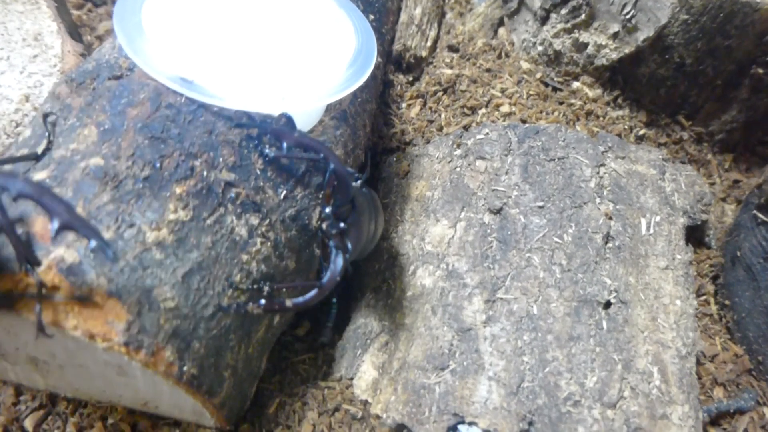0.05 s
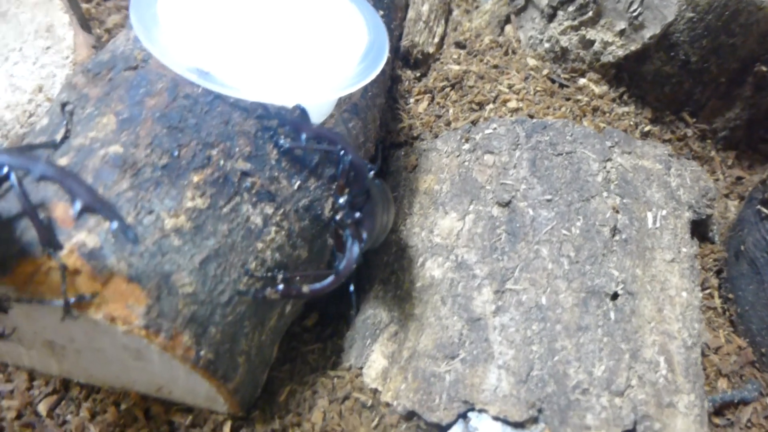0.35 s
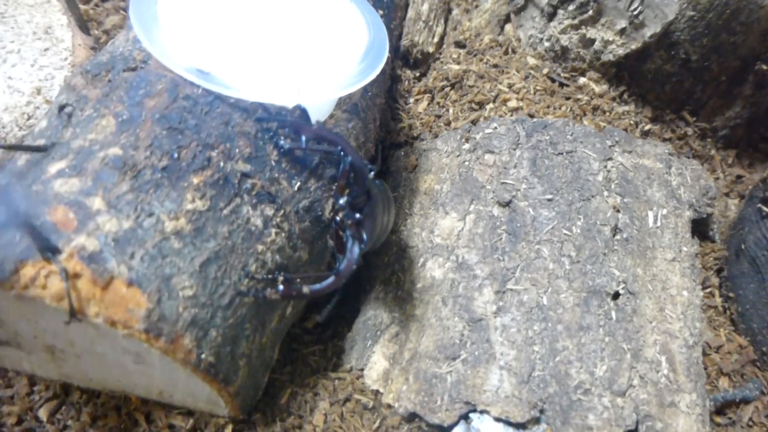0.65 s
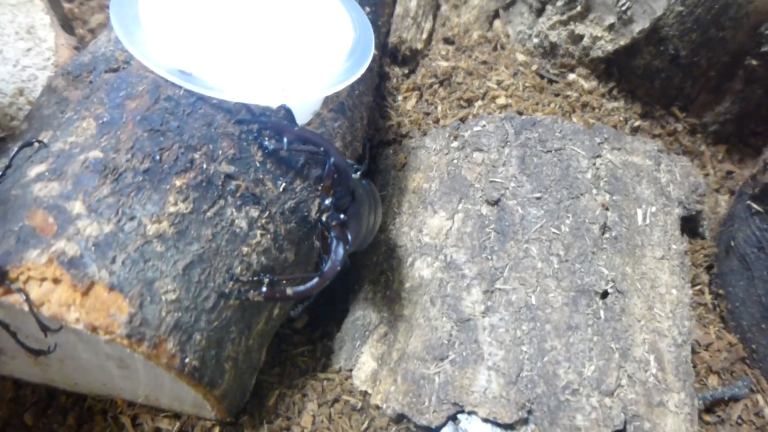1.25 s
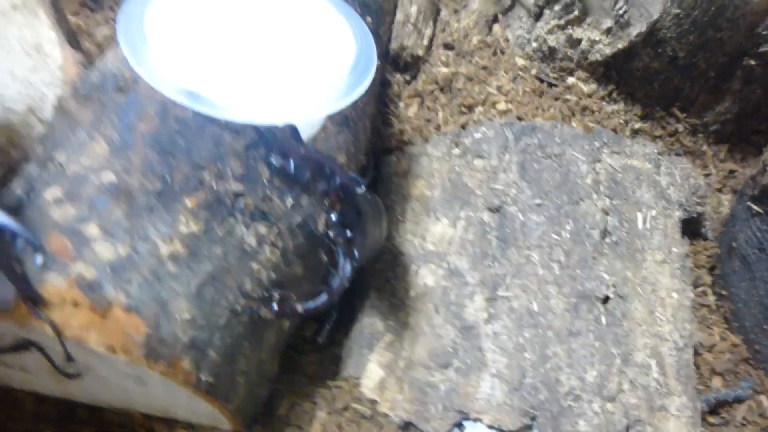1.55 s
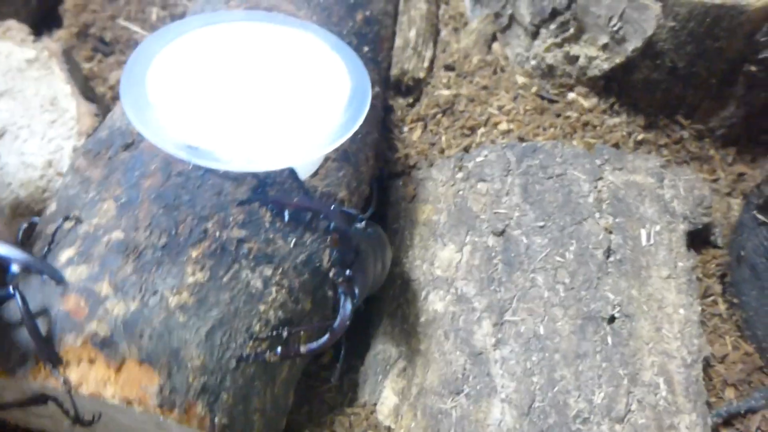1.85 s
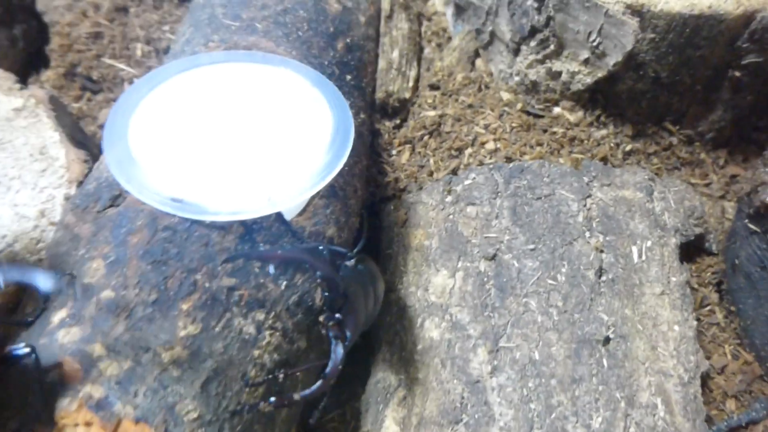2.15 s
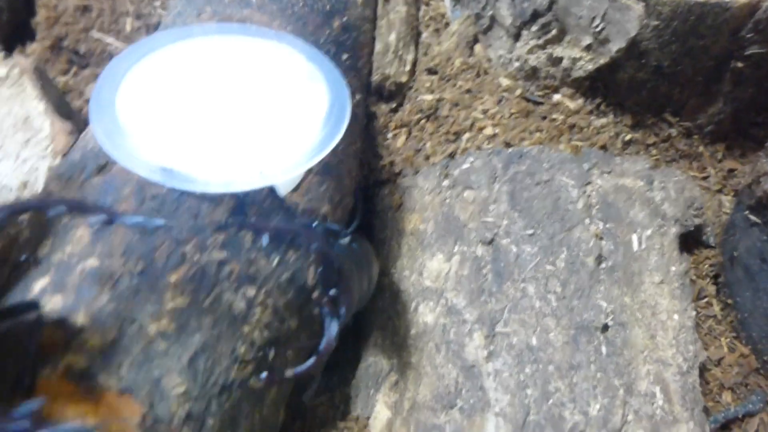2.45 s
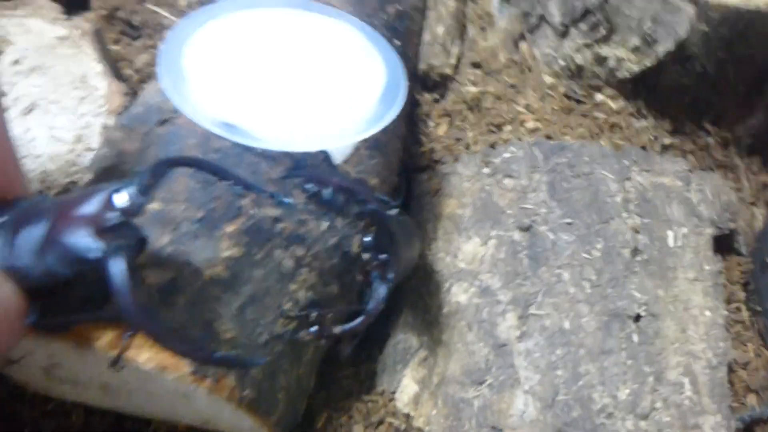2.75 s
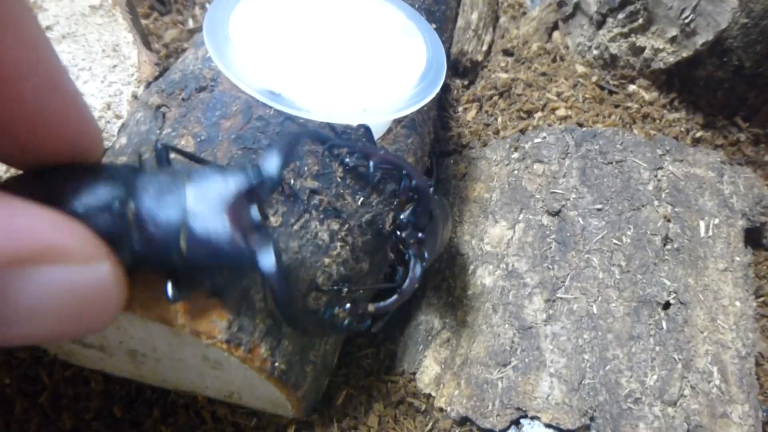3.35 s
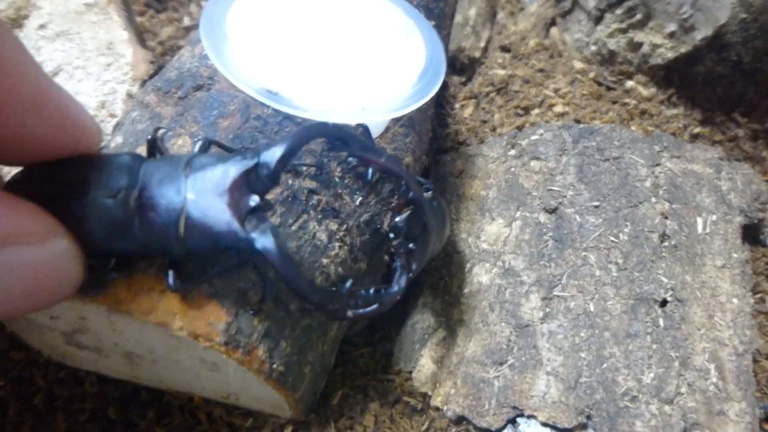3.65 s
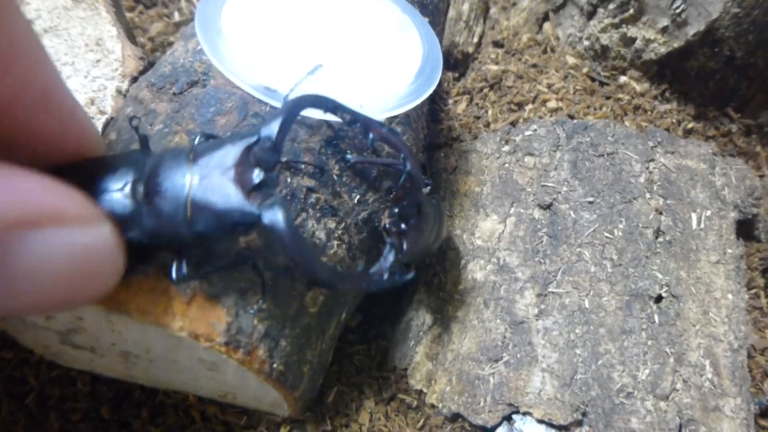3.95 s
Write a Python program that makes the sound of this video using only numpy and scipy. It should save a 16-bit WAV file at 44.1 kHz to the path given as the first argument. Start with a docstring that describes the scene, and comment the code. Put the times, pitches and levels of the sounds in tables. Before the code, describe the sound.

Beetle claws tick and scrape lightly on a log, growing busier with a few faint wooden knocks, until three sharp jaw clicks stand out. A low rumble and thin hiss continue underneath in a small, slightly echoing room.

```python
"""On a log in a small room, two stag beetles meet, a little to the left. Their claws tick as they
catch on the bark and scrape as they drag over it in many tiny slips. The wood knocks dully when
a body bumps it. Near the end their hard jaws click together three times, shell on shell.
The room echoes faintly, over a steady rumble and a thin hiss."""
import sys
import numpy as np
from scipy import signal
from scipy.fft import rfft, irfft, next_fast_len
from scipy.io import wavfile
from scipy.ndimage import uniform_filter1d

SR = 44100
rng = np.random.default_rng(int(sys.argv[2]) if len(sys.argv) > 2 else 0)


def transcribe(signal):
    """Save signal, clipped to [-1, 1], as a 16-bit WAV file at the path in sys.argv[1]."""
    frames = np.atleast_2d(signal).T
    limited = np.clip(frames, -1, 1)
    pcm = np.round(limited * 32767).astype(np.int16)
    wavfile.write(sys.argv[1], SR, pcm)


N = 176400

# How much of a click's treble boost each pitch gets: (frequency [Hz], share [0-1])
TREBLE_SHARE = [(8500, 0.12), (11000, 0.88)]
# The same for its glint, the glassy very top: (frequency [Hz], share [0-1])
GLINT_SHARE = [(12500, 0), (14500, 1)]
SLIP_S = 0.0032  # the slip before a click swells by 60 dB in this time


def amp(db):
    """Turn decibels into a gain."""
    return 10 ** (np.asarray(db) / 20)


def unit(x):
    """Scale to an average (rms) level of 1."""
    return x / np.sqrt(np.mean(x ** 2) + 1e-20)


def burst(x):
    """Scale to the energy of one millisecond at level 1."""
    return unit(x) * np.sqrt(SR / 1000 / x.shape[-1])


def along(points, hz):
    """Read a curve of (frequency, value) points on a log frequency axis."""
    freqs, values = np.transpose(points)
    return np.interp(np.log(hz + 1), np.log(freqs + 1), values)


def filtered(x, response):
    """Give each frequency in x the gain response(hz)."""
    size = next_fast_len(N + SR // 2)
    return irfft(rfft(x, size) * response(np.fft.rfftfreq(size, 1 / SR)), size)[..., :N]


def shape_tone(x, gain_db):
    """Filter a short sound so that no ringing comes ahead of it (minimum phase)."""
    cepstrum = irfft(np.log(amp(gain_db)))
    half = len(cepstrum) // 2
    one_sided = np.r_[cepstrum[0], 2 * cepstrum[1:half], np.zeros(half)]
    return irfft(rfft(x) * np.exp(rfft(one_sided)))


def add(track, start, x):
    """Mix x into the track, start seconds in."""
    part = track[:, round(start * SR):][:, :x.shape[-1]]
    part += x[..., :part.shape[1]]


def stereo_noise(size, apart_radians=0.33):
    """Noise that is mostly alike on the left and right."""
    common, side = rng.standard_normal((2, size))
    return np.cos(apart_radians) * common + np.sin(apart_radians) * np.array([side, -side])


def hump(hz, ring_hz, width_hz=720):
    """A broad peak of height 1 around the pitch where something rings."""
    return 1 / (1 + ((hz - ring_hz) / width_hz) ** 2)


def ring(hz, t60, attack_s=0.000081):
    """One ringing tone; t60 is the seconds it takes to fade by 60 dB."""
    t = np.arange(SR // 8) / SR
    return amp(-60 * t / t60) * (1 - np.exp(-t / attack_s)) * np.sin(2 * np.pi * hz * t)


def room_air(level_db=-48, flicker_db=1.03):
    """Steady rumble and hiss: the bass sits right; in the middle pitches the sides move oppositely."""
    # Tone of the air on the right: (frequency [Hz], relative level [dB])
    tone = [(20, -23), (65, -25), (100, -13), (160, -3), (220, 0.5), (320, -0.47), (450, -3), (700, -5),
            (1150, -6), (1600, -13.5), (2000, -17), (2500, -22), (3600, -26), (4100, -22.5), (4500, -24.5),
            (5200, -21), (6200, -27.5), (9500, -29.5), (13000, -32.5), (15700, -37)]
    # How much louder the left is: (frequency [Hz], level [dB])
    balance = [(60, 0.5), (99, -8.5), (160, -11), (270, -16.5), (450, -13), (740, -6), (1220, -2.0),
               (2010, 0), (3330, -0.5), (5500, -0.5), (9080, -0.5), (15000, -3)]
    # How alike the two sides are: (frequency [Hz], likeness [0-1])
    likeness = [(40, 0.48), (150, 0.93), (260, 0.78), (350, 0.84), (420, .2), (560, 0.9), (1000, 0.97),
                (2000, 0.75), (3300, 0.5), (5500, 0.28), (8000, 0.44), (13000, 0.65)]
    # How far the left wave runs ahead: (frequency [Hz], phase [radians])
    lead = [(350, 0), (460, 3.5), (1000, 3), (2000, 3), (4300, 2), (5500, 1.5), (7000, 0.7), (14000, 1)]
    spectra = signal.stft(rng.standard_normal((2, N)), nperseg=512)[2]
    flicker = uniform_filter1d(rng.standard_normal(spectra.shape[1:]), size=5, axis=0)  # smooth in pitch
    flicker = uniform_filter1d(flicker, size=14, axis=1)  # and in time
    right, other = signal.istft(spectra * amp(flicker_db * unit(flicker)), nperseg=512)[1][:, :N]
    shared = filtered(right, lambda hz: along(likeness, hz) * np.exp(1j * along(lead, hz)))
    separate = filtered(other, lambda hz: np.sqrt(1 - along(likeness, hz) ** 2))
    left = filtered(shared + separate, lambda hz: amp(along(balance, hz)))
    return amp(level_db) * unit(filtered(np.array([left, right]), lambda hz: amp(along(tone, hz))))


def room_echo(x):
    """The room answers with a short, blurred echo, different on each side."""
    # How long the echo lasts: (frequency [Hz], time to fade by 60 dB [s])
    fade_times = [(1000, 0.4), (6000, 0.37), (10000, 0.3), (16000, 0.26)]
    hz, t, spectra = signal.stft(rng.standard_normal((2, SR // 2)), SR, nperseg=256)
    fade = amp(-60 * t / along(fade_times, hz)[:, None])
    tail = signal.istft(spectra * fade, SR, nperseg=256)[1]
    return signal.fftconvolve(x, tail / np.linalg.norm(tail[0]), axes=1)[:, :N]


def log_knocks():
    """The wood rings briefly when a body bumps it."""
    # Dull knocks: (time [s], level [dB], pitch [Hz], time to fade by 60 dB [s])
    knocks = [(2.062, -48.5, 1240, .08), (2.295, -50, 2700, 0.013), (2.507, -50, 2830, .02),
              (2.804, -53, 1260, 0.077), (2.836, -50.5, 1310, 0.047)]
    out = np.zeros((2, N))
    for start, db, hz, t60 in knocks:
        add(out, start, amp(db) * burst(ring(hz, t60)))
    return out


def tiny_slips(per_s, spread_db=4.5, t60=0.008):
    """Claws slip on the bark at random moments, each slip a quickly fading puff of noise."""
    # Tone of scraped bark: (frequency [Hz], relative level [dB])
    tone = [(1000, -14.5), (2500, -9.5), (3600, -8), (5000, -2), (8300, 1.5), (10000, .5), (13000, -5),
            (15500, -7)]
    moments = rng.random(N) < per_s / SR
    slips = moments * amp(spread_db * np.clip(rng.standard_normal(N), -2, 2))
    energy = signal.lfilter([1], [1, -amp(-120 / SR / t60)], slips ** 2)  # each slip dies away
    return unit(filtered(np.sqrt(energy) * stereo_noise(N), lambda hz: amp(along(tone, hz))))


def scraping():
    """Dragged claws make short, dense scrapes over the faint stirring of legs."""
    # Claws dragged over bark: (time [s], length [s], level [dB])
    drags = [(0.8, 0.065, -63), (1.478, 0.062, -60), (2.235, 0.12, -61), (2.47, 0.17, -64),
             (2.803, 0.079, -68), (3.375, 0.062, -57), (3.49, 0.1, -59), (3.597, 0.13, -66),
             (3.811, 0.044, -50)]
    # Stirring legs: (time [s], level [dB])
    leg_levels = [(0, -69.5), (1.9, -79), (2.2, -67.5), (3.6, -68), (4, -72)]
    t = np.arange(N) / SR
    strokes = sum(amp(db) * np.sin(np.pi * np.clip((t - start) / length, 0, 1))
                  for start, length, db in drags)
    stirring = amp(np.interp(t, *np.transpose(leg_levels)))
    return strokes * tiny_slips(per_s=1300) + stirring * tiny_slips(per_s=300)


def snap(tone_db, t60, catch_db, bounce_s=0.00085, bounce_db=-10, size=2048):
    """One click: a short slip, a sharp catch, its bounce off the log and quickly dying chatter."""
    catch = round(SLIP_S * SR)
    t = (np.arange(size) - catch) / SR
    swell_and_fade = amp(-60 * np.maximum(t / t60, -t / SLIP_S))
    push = unit(stereo_noise(size) * swell_and_fade) / np.sqrt(size)
    push[:, catch] += amp(catch_db)
    push[:, catch + round(bounce_s * SR)] += amp(catch_db + bounce_db)
    return burst(shape_tone(push, tone_db(np.fft.rfftfreq(size, 1 / SR))))


def claw_ticks(ring_db=6):
    """Claws catch on the bark, each tick with its own ring and brightness."""
    # Catches: (time [s], level [dB], ring [Hz], body boost [dB], treble boost [dB], glint boost [dB])
    ticks = [(0.8194, -36.5, 5560, -11, -4, -1), (0.843, -51, 5230, -2, -10, 0),
             (.9562, -50, 5200, 7, -6, 0), (1.0545, -47, 12100, -8, 10, 0), (1.4963, -49.5, 8800, 4, -5, 0),
             (1.5325, -45.5, 10200, 2, 14, -3), (1.5506, -38, 6500, 2, -1, 0),
             (1.8486, -51.5, 8200, 5, 5, 0), (1.8994, -47, 9300, 20, 5, 1),
             (2.0003, -45.5, 9300, 12, 4, -2), (2.0816, -38.5, 9100, 6, 4, 3),
             (2.1722, -49.5, 5000, 9, -7, 0), (2.2364, -47, 9300, 3, 5, 3), (2.2553, -51, 10400, 4, 8, 0),
             (2.296, -34, 11500, 4, 4, -2), (2.3145, -47, 8700, 17, 0, 0), (2.323, -47, 11900, 3, 7, 0),
             (2.4322, -39.5, 10100, -8, 11, -1), (2.4632, -32.5, 7540, -8, -0.5, 0),
             (2.487, -46, 7700, 5, -2, 0), (2.5066, -36.5, 6300, 11, 3, 1),
             (2.5237, -38.5, 7200, 16, -2, 1), (2.537, -50, 9000, 0, 3, 0), (2.548, -30.5, 7200, -5, -5, 1),
             (2.5576, -45, 7200, -3, -10, 0), (2.581, -53, 7000, 0, -3, 0), (2.5978, -39, 7500, 4, 2, 5),
             (2.606, -36, 6600, -3, -13, -1), (2.624, -42.5, 7200, 6, 3, 0), (2.711, -46, 4900, 7, 1, 0),
             (2.7215, -43.5, 7000, -5, -15, 0), (2.749, -35, 7000, -3, -4, -1),
             (2.7665, -34, 8200, -3, -3, -1), (2.8056, -49, 6900, -1, -8, 0), (2.8201, -46, 6800, 3, -5, 0),
             (2.839, -32.5, 6760, -11, -9, 8), (2.8457, -33, 7500, -6, -4, 3),
             (2.9885, -42, 8050, -4, -2, 13), (3.065, -36.5, 6360, 7, -6, 6), (3.135, -46, 9500, -3, 1, 4),
             (3.2104, -32.5, 9300, -5, -4, -2), (3.2229, -43, 5140, -2, -4, 0),
             (3.3638, -35, 6800, -18, -6, 0), (3.3686, -31.5, 6000, 1, -8, -2),
             (3.382, -34.5, 8700, 5, -1, 3), (3.4762, -49, 8800, 4, -5, 0), (3.4833, -45, 8800, 1, -11, 0),
             (3.4975, -33.5, 8700, -13, -8, -10), (3.5254, -36, 5060, -1, -13, 4),
             (3.551, -48, 8700, -1, -1, 0), (3.5994, -45, 13000, 3, 8, 4), (3.621, -46, 9000, -1, 4, 2),
             (3.6575, -45.5, 8900, 10, 4, 2), (3.674, -47, 12700, 3, 7, 0), (3.829, -43, 8500, 2, 2, 0),
             (3.836, -46, 8900, 1, -3, -5), (3.9661, -44, 8950, -11, 2, 0)]
    # Tone common to all ticks: (frequency [Hz], relative level [dB])
    base_tone = [(1000, -16.5), (2500, -19), (3500, -15.5), (5000, -4), (7000, 0), (9500, -1.5),
                 (11500, -3), (15500, -12.5)]
    # How much of the boost to a tick's body, its lower part, each pitch gets:
    # (frequency [Hz], share [0-1])
    body_share = [(4300, 0.69), (6000, 0.21)]
    out = np.zeros((2, N))
    for start, db, ring_hz, body_db, treble_db, glint_db in ticks:
        tone = lambda hz: (along(base_tone, hz) + ring_db * hump(hz, ring_hz)
                           + body_db * along(body_share, hz) + treble_db * along(TREBLE_SHARE, hz)
                           + glint_db * along(GLINT_SHARE, hz))
        add(out, start - SLIP_S, amp(db) * snap(tone, t60=0.014, catch_db=-4.5))
    return out


def jaw_clicks(ring_db=2, shell_db=-13):
    """Hard shell hits hard shell: a crack and a few short ringing tones."""
    # Jaws meeting: (time [s], level [dB], ring [Hz], treble boost [dB], glint boost [dB])
    clicks = [(3.2822, -28, 6700, -6, 13), (3.3354, -17.5, 6440, 1.5, 0), (3.3775, -19, 9050, 3, -3)]
    # Tone of the crack: (frequency [Hz], relative level [dB])
    base_tone = [(1000, -57), (3100, -31), (4100, -14), (5200, -3), (6200, -0.5), (9300, 1.5),
                 (11000, -10.5), (13000, -18), (15500, -24)]
    # Ringing of the shell: (pitch [Hz], relative level [dB], time to fade by 60 dB [s])
    shell_tones = [(5000, -6, 0.0093), (6000, 2, 0.013), (7000, 7, 0.017), (7550, -3, .01),
                   (8800, -4, 0.012), (9970, -8, 0.01)]
    out = np.zeros((2, N))
    for start, db, ring_hz, treble_db, glint_db in clicks:
        tone = lambda hz: (along(base_tone, hz) + ring_db * hump(hz, ring_hz)
                           + treble_db * along(TREBLE_SHARE, hz) + glint_db * along(GLINT_SHARE, hz))
        shell = sum(amp(level + rng.normal(0, 2.2)) * ring(hz, t60) for hz, level, t60 in shell_tones)
        add(out, start - SLIP_S, amp(db) * snap(tone, t60=0.012, catch_db=4.5))
        add(out, start, amp(db + shell_db) * burst(shell))
    return out


def scene(left_over_right_db=3.5, echo_db=-18):
    """The beetles a little to the left, with the room's echo and air."""
    beetles = claw_ticks() + jaw_clicks() + scraping() + log_knocks()
    pan = amp([[left_over_right_db / 2], [-left_over_right_db / 2]])
    return beetles * pan + amp(echo_db) * room_echo(beetles) + room_air()


def record(dry):
    """Cut away the very highest treble."""
    top_hz, edge_width_hz = 15900, 400
    return filtered(dry, lambda hz: np.clip((top_hz - hz) / edge_width_hz + .5, 0, 1))


dry = scene()
out = record(dry)
transcribe(out)
```